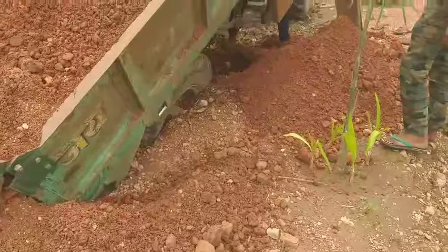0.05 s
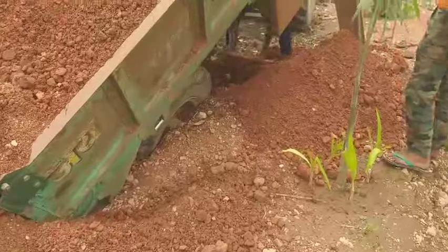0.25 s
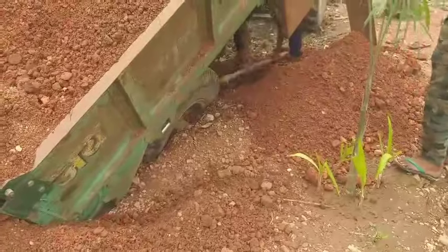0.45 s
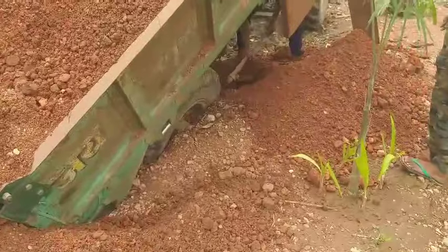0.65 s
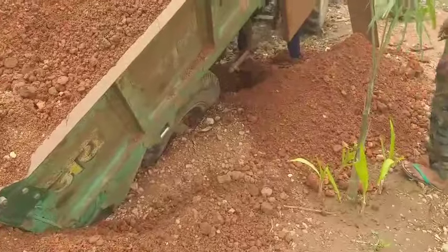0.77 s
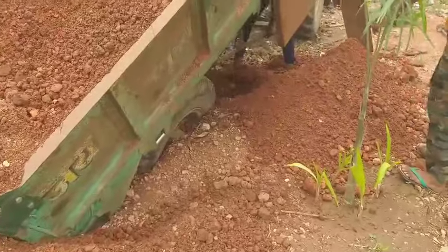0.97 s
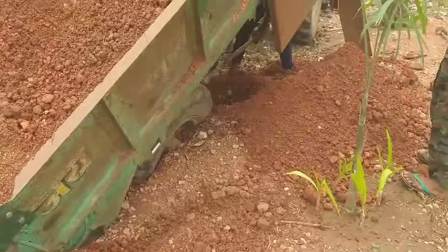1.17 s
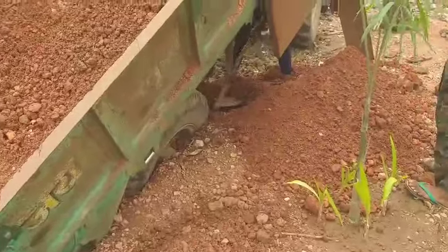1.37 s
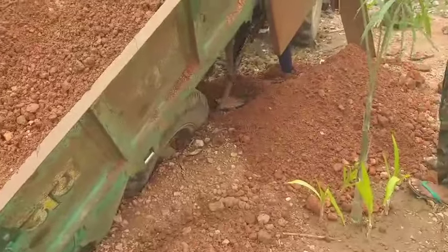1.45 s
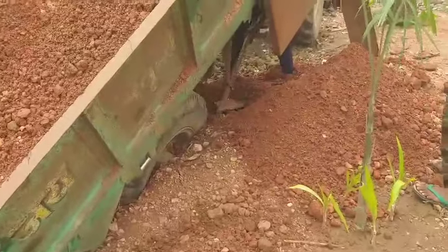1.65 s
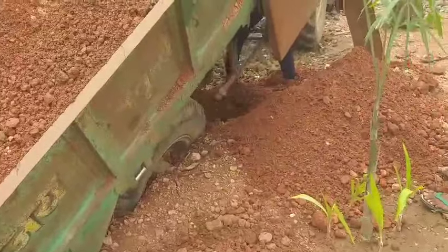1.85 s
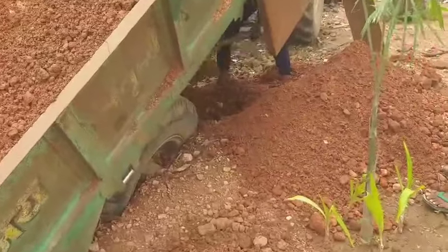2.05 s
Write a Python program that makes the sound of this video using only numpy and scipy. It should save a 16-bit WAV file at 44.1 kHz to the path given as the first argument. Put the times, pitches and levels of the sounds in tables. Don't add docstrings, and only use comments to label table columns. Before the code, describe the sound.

Two shovel digs in loose stony earth: hard crunching strikes and gritty scraping, a pause of ticking pebbles and a dull clod, then a sharper second scrape; dry open air, a few metres from a small camera microphone.

```python
import sys
import numpy as np
from scipy import signal
from scipy.io import wavfile
from scipy.ndimage import uniform_filter1d, minimum_filter1d

SR = 44100
rng = np.random.default_rng(int(sys.argv[2]) if len(sys.argv) > 2 else 0)


def undo_db(level):
    steps = np.asarray(level, float) / 20
    return 10 ** steps


def output_pcm(signal):
    pcm = np.clip(np.atleast_2d(signal).T, -1, 1) * 32767
    wavfile.write(sys.argv[1], SR, np.round(pcm).astype(np.int16))


N = 92610


def evened(x):
    return x / np.sqrt(np.mean(x ** 2) + 1e-20)


def read(points, hz):
    f, value = np.transpose(points)
    return np.interp(np.log(hz + 1), np.log(f + 1), value)


def level_over_time(points):
    return np.interp(np.arange(N) / SR, *np.transpose(points))


def add(mix, s, sound):
    part = mix[round(s * SR):][:len(sound)]
    part += sound[:len(part)]


def colour(x, db_of):
    db = np.maximum(db_of(np.abs(np.fft.fftfreq(8192, 1 / SR))), -100)
    log_gain = db * np.log(10) / 20
    taps = np.fft.ifft(np.exp(np.conj(signal.hilbert(log_gain)))).real[:4096]
    return signal.oaconvolve(x, taps)[:len(x)]


def band(x, lo_hz, hi_hz):
    sos = signal.butter(2, [lo_hz, min(hi_hz, 20000)], "bandpass", fs=SR, output="sos")
    return signal.sosfilt(sos, x)


def slow_wander():
    noise = rng.standard_normal(N)
    return evened(uniform_filter1d(uniform_filter1d(noise, size=900), size=900))


# f/Hz, level/dB
MURMUR = [(25, -12), (50, -8), (85, 0), (140, 0), (300, -8), (500, -19.5), (800, -29)]


def rumble():
    air = colour(rng.standard_normal(N), lambda hz: read(MURMUR, hz) - 30 * (hz > 800))
    return undo_db(-58.5 + 1.5) * evened(air)


def grains(per_s, spread_db, clump_db):
    clump = rng.standard_normal((5, N))
    clump = uniform_filter1d(uniform_filter1d(clump, size=300), size=300)
    clump = evened(clump[1:] + 1.5 * clump[0])
    struck = rng.random(N) < per_s / SR
    size = undo_db(spread_db * np.minimum(rng.exponential(1, N), 4)) * struck
    kind, t, out = rng.integers(0, 48, N), np.arange(500) / SR, np.zeros(N)
    for k, hz in enumerate(np.geomspace(450, 15800, num=48)):
        chip = np.sin(2 * np.pi * hz * t) * t * np.exp(-t * (700 + hz / 4.5))
        chip = chip / np.linalg.norm(chip) * np.sqrt(hz)
        impacts = size * (kind == k) * undo_db(clump_db * clump[k // 12])
        out += signal.oaconvolve(impacts, chip)[:N]
    return evened(out)


# f/Hz, level/dB
SOIL_TONE = [(300, -43), (700, -43), (1500, -24), (3000, -21), (5000, -11), (8000, 4), (12500, -5),
             (15500, -13)]
# t/s, level/dB
SOIL_FLOW = [(0, -44), (1.3, -51), (1.8, -43), (2.1, -52.5)]


def trickle():
    soil = grains(per_s=16000, spread_db=0.71, clump_db=-2.3)
    soil = evened(colour(soil, lambda hz: read(SOIL_TONE, hz)))
    return undo_db(level_over_time(SOIL_FLOW) - 3.5) * soil


# t/s, level/dB, coarse lumps level/dB, fine dust level/dB
SLIDING = [(0, -43, 4, 6), (0.068, -43, 10.5, 6), (0.214, -47, -6.5, 8), (0.243, -33, -9, -1),
           (.4, -35.5, 1, -3), (.48, -37, -3.5, -2), (.53, -33.5, -9.5, -10), (.68, -41.5, 4, 4),
           (.88, -46.5, -9.5, 8), (1.0, -48.5, 9.5, 8), (1.24, -47, 1.5, 10), (1.29, -35.5, 1, -3.5),
           (1.44, -42, -6.5, 15), (1.49, -40.5, 0, 6.5), (1.56, -31, -1.5, -1), (1.65, -42, 1.5, 3.5),
           (1.82, -35, -4.5, -4.5), (2.1, -52, -0.5, -2)]
# f/Hz, level/dB
GRIT_TONE = [(500, -53), (1500, -10.5), (3000, -6), (5000, 0), (7000, -6.5), (10000, -14.5)]


def slide():
    t, (s, db, coarse_db, fine_db) = np.arange(N) / SR, np.transpose(SLIDING)
    grit = grains(per_s=14000, spread_db=2.6, clump_db=1.7)
    grit = evened(colour(grit, lambda hz: read(GRIT_TONE, hz)))
    lumps = evened(band(grains(5000, 2.5, clump_db=1.8), 550, 1900))
    dust = evened(band(grains(14000, 2.0, clump_db=1.3), 5500, 13500))
    rattle = undo_db(np.interp(t, s, coarse_db) - 11.5) * lumps
    hiss = undo_db(np.interp(t, s, fine_db) - 9.5) * dust
    return undo_db(np.interp(t, s, db)) * (grit + rattle + hiss)


def volley(t, scatter):
    draw = rng.standard_normal((2, len(t)))
    sparse = draw[0] * (abs(draw[1]) > 1.5)
    hits = sparse * np.exp(-t / np.clip(scatter, .0003, .012))
    hits *= np.minimum(t / (.15 * scatter), 1)
    hits[2] = 2.5 * min(1, .002 / scatter)
    return hits / np.linalg.norm(hits)


# t/s, level/dB, low ring level/dB, crunch length/s
FLAT_STRIKES = [
    (.033, -26, 17, 0.054),
    (.2255, -9.5, 13, 0.016),
    (.2326, -8.5, 6, 0.017),
    (.298, -16.5, 6, 0.011),
    (.304, -15.5, 7, 0.0066),
    (.358, -22, 14, 0.0089),
    (.4892, -6.5, 1.5, 0.0091),
    (.5065, -11.5, 8, 0.0035),
]
# t/s, level/dB, low ring level/dB, crunch length/s
EDGE_STRIKES = [
    (1.254, -9.5, -2.5, 0.013),
    (1.2582, -11, -5.5, 0.0086),
    (1.262, -10, -5.5, 0.019),
    (1.275, -15, 0.5, 0.0058),
    (1.335, -21.5, -9, 0.011),
]
# f/Hz, level/dB, t60/s
FLAT_MODES = [(824, -9.5, 0.025), (1690, -29, 0.075), (3050, -5, 0.048), (4050, 0, 0.058), (4530, 3, 0.018),
              (5220, -2, 0.036), (5500, 1, 0.014), (7100, -14, 0.021), (8430, -5.5, 0.032)]
# f/Hz, level/dB, t60/s
EDGE_MODES = [(674, 1, 0.067), (864, -19, 0.072), (1073, 3, 0.15), (1700, 1.5, 0.027), (2870, 0, 0.0078),
              (3060, -16, 0.012), (3570, -4, 0.034), (4490, 10, 0.0088), (5000, -2, 0.012),
              (5690, 1.5, .02), (8270, -3, 0.0083)]


def blade(strikes, modes):
    out, t = np.zeros(N), np.arange(5000) / SR
    for s, db, low_db, length in strikes:
        drive = volley(t, .5 * length)
        ring = np.zeros(len(t))
        for hz, mode_db, t60 in modes:
            high, detune = hz > 2000, rng.standard_normal()
            longest_s = .06 * (.5 if high else 1)
            level_db = mode_db + low_db * (hz < 2000) - 60 * t / min(t60, longest_s)
            tone = np.sin(2 * np.pi * hz * (1 + 0.024 * high * detune) * t)
            beating = 1 + 0.62 * high * np.cos(2 * np.pi * 90 * detune * t)
            ring += undo_db(level_db) * tone * beating
        ring = band(signal.fftconvolve(drive, ring)[:len(t)], 1110, 8700)
        crunch = 3 * band(drive, 4440, 8870)
        thud = 3 * band(band(drive, 630, 3800), 620, 2100)
        add(out, s, undo_db(db) * (undo_db(-11) * ring + undo_db(6) * crunch + undo_db(-0.5) * thud))
    return out


# t/s, level/dB, f/Hz, scatter/s
CLICKING_STONES = [(.065, -22.5, 8000, .001), (0.103, -16.5, 4600, 0.0011), (0.157, -23.5, 8200, 0.0042),
                   (0.346, -12, 6660, 0.0013), (0.372, -17, 4220, 0.0016), (0.378, -21, 3200, 0.003),
                   (0.39, -20, 8800, 0.012), (0.4427, -12.5, 3750, 0.0075), (.462, -26, 7500, 0.0081),
                   (0.5286, -13, 5000, 0.0005), (0.537, -17.5, 3220, 0.0028), (.568, -20.5, 5160, 0.0018),
                   (0.627, -12.5, 3370, 0.0008), (.655, -15, 2400, 0.00058), (0.709, -21, 7040, 0.0025),
                   (0.7524, -18, 2950, 0.00073), (0.808, -19.5, 10500, 0.004), (.895, -17, 4300, 0.0004),
                   (.931, -16, 4450, 0.0041), (.950, -17, 3070, 0.0057), (0.9583, -16.5, 9400, 0.00036),
                   (0.966, -22, 3200, 0.00037), (.971, -19, 5500, 0.002), (0.985, -12.5, 4770, 0.0011),
                   (1.003, -13.5, 3960, 0.0038), (1.015, -12, 2770, .0004), (1.0173, -11.5, 2170, 0.0011),
                   (1.0268, -23, 8350, 0.0006), (1.046, -24, 4280, 0.00056),
                   (1.0718, -26, 8500, 0.0005), (1.092, -27.5, 2400, .0005), (1.097, -22, 4600, 0.0047),
                 (1.1086, -13, 4330, 0.001), (1.144, -31.5, 2500, .001), (1.172, -23, 8500, 0.0033),
                 (1.19, -30, 3600, .0006), (1.207, -21, 2130, 0.0048), (1.2078, -13, 5100, 0.0014),
                 (1.209, -13.5, 11000, .001), (1.23, -23, 3150, .001), (1.302, -21.5, 7540, 0.004),
                 (1.33, -12.5, 5330, 0.002), (1.345, -16.5, 4930, 0.0057), (1.379, -24, 9000, 0.001),
                 (1.381, -27, 5000, 0.0032), (1.418, -21, 7160, 0.017), (1.442, -17, 8600, 0.0037),
                 (1.445, -14.5, 5400, 0.0078), (1.505, -26.5, 5240, 0.0046), (1.523, -18, 6500, .001),
                 (1.441, -23.5, 2330, 0.0077), (1.528, -19.5, 7600, 0.0047), (1.553, -23, 4970, 0.0046),
                 (1.559, -12.5, 5550, 0.0097), (1.5787, -1.5, 6160, 0.00234), (1.624, -16.5, 5760, 0.0077),
                 (1.663, -18.5, 5600, 0.0059), (1.6846, -14.5, 6300, 0.0037), (1.688, -17.5, 6630, .006),
                 (1.688, -18, 2600, 0.0054), (1.695, -13, 5300, 0.0031), (1.734, -17.5, 5240, 0.0077),
                 (1.735, -30.5, 1570, .01), (1.764, -21, 5000, 0.0041), (1.781, -19.5, 10200, 0.011),
                 (1.796, -20, 6000, 0.0032), (1.81, -18, 3640, 0.004), (1.877, -32, 3200, 0.0024),
                 (2.024, -17.5, 4560, 0.00038)]


def stones():
    width, skirt_db = 1.35, -13
    tail_s, tail_db = .009, -33
    out, t = np.zeros(N), np.arange(2500) / SR
    for s, db, hz, scatter in CLICKING_STONES:
        tail = undo_db(tail_db) * rng.standard_normal(len(t)) * np.exp(-t / tail_s)
        contacts = volley(t, scatter) + tail
        click = band(contacts, hz / width, hz * width) + undo_db(skirt_db) * band(contacts, hz / 3, hz * 2)
        add(out, s, undo_db(db - 1) * click / np.abs(click).max())
    return out


# f/Hz, level/dB
FLAT_VOICE = [(760, -2.5), (1600, -12), (2950, 0.5), (3900, -0.5), (4290, 4), (4480, -4), (5100, 3),
              (5450, -4), (7680, -1.5)]
# f/Hz, level/dB
EDGE_VOICE = [(1500, -14.5), (2310, -11), (4300, -1), (4660, -3.5), (5090, 3.5), (5600, 6), (6470, 5.5),
              (7360, -9), (8400, 1)]
# t/s, level/dB
RUBBING = [(.21, -70), (.24, -34), (.26, -41), (.31, -33), (.38, -33.5), (.44, -49), (.52, -35.5),
           (.62, -52), (.7, -66), (1.24, -74), (1.28, -35), (1.35, -35), (1.46, -37), (1.51, -33.5),
           (1.59, -37.5), (1.66, -42), (1.85, -53), (2.05, -75)]


def song():
    width_hz, wander, turn_s = 110, .012, 1.0
    t, out = np.arange(N) / SR, np.zeros(N)
    decay = np.exp(-np.pi * width_hz / SR)
    for modes, side in ((FLAT_VOICE, t < turn_s), (EDGE_VOICE, t >= turn_s)):
        voice = np.zeros(N)
        for hz, db in modes:
            rub = rng.standard_normal(N) ** 3
            drift, swell = slow_wander(), slow_wander()
            spin = np.exp(2j * np.pi * np.cumsum(hz * (1 + wander * drift)) / SR)
            mode = (spin * signal.lfilter([1], [1, -decay], rub / spin)).real
            voice += undo_db(db + 2.5 * swell) * evened(mode)
        out += side * evened(voice)
    return undo_db(level_over_time(RUBBING)) * out


# t/s, level/dB, f/Hz, t60/s
SHORT_RINGS = [(.2327, -9.5, 4600, 0.018), (0.2325, -6.5, 5420, 0.014), (.2353, -13.5, 4760, .015),
               (.3035, -28, 7650, 0.023), (0.4427, -17.5, 2870, 0.027), (0.4432, -17.5, 4520, 0.02),
               (0.4428, -30.5, 1504, 0.076), (0.489, -15, 2830, 0.041), (0.5057, -15, 5040, 0.023),
               (.7028, -17, 1810, 0.011), (1.0043, -13, 3225, 0.022), (1.0043, -18, 940, 0.014),
               (1.2542, -7, 4480, 0.013), (1.2585, -29, 7960, 0.016), (1.4208, -18, 5660, 0.015),
               (1.4415, -25, 2230, 0.015), (1.529, -20, 4320, .025), (1.5778, -7, 5370, 0.015),
               (1.5782, -10.5, 7400, 0.017), (1.5772, -20, 11160, 0.016)]


def chimes():
    out, t = np.zeros(N), np.arange(2500) / SR
    for s, db, hz, t60 in SHORT_RINGS:
        onset = np.minimum(t / 0.00044, 1)
        add(out, s, undo_db(db - 60 * t / t60) * onset * np.sin(2 * np.pi * hz * t))
    return out


# t/s, level/dB, f/Hz
EARTH_LUMPS = [
    (0.703, -13, 710),
    (.7026, -31.5, 166),
    (0.67, -34, 550),
    (0.952, -33.5, 760),
    (1.0172, -20.5, 1100),
]


def clod():
    out, t = np.zeros(N), np.arange(1500) / SR
    for s, db, hz in EARTH_LUMPS:
        onset, decay = np.minimum(t / .00015, 1), np.exp(-t * hz / .62)
        wobble = onset * np.cos(2 * np.pi * hz * t - .5) * decay
        push = band(wobble, hz / 6, hz * 5)
        add(out, s, undo_db(db) * push / np.abs(push).max())
    return out


def scene():
    ground = rumble() + trickle() + slide()
    shovel = blade(FLAT_STRIKES, FLAT_MODES) + blade(EDGE_STRIKES, EDGE_MODES) + song()
    mono = ground + shovel + stones() + chimes() + clod()
    return np.array([mono, mono])


def band_limit(x):
    return signal.sosfilt(signal.butter(12, 16510, fs=SR, output="sos"), x)


# f/Hz, width/Hz, level/dB
MIC_TREBLE = [(5000, 250, 1.5), (6330, 450, -7), (8000, 790, 3.5), (9990, 750, -5.5), (12070, 1880, 6.5)]
# f/Hz, level/dB
SIDE_LEAK = [(300, -38), (800, -49), (1500, -17), (2600, -20.5), (5000, -53.5), (9500, -18), (12000, -27)]


def record(dry):
    def mic_db(hz):
        treble = sum(db * np.exp(-((hz - f) / w) ** 2) for f, w, db in MIC_TREBLE)
        low_cut = 14 * np.log2(np.clip(70 / (hz + 1), 1, 8))
        top_cut = 60 * np.clip((hz - 15450) / 700, 0, 1)
        return treble - low_cut - top_cut
    mid = colour(dry[0], mic_db)
    peak = uniform_filter1d(-minimum_filter1d(-abs(mid), size=177), size=89)
    mid = mid / np.maximum(peak / .94, 1)
    side = colour(mid, lambda hz: read(SIDE_LEAK, hz))
    return band_limit(np.array([mid + side, mid - side]))


dry = scene()
out = record(dry)
output_pcm(out)
```